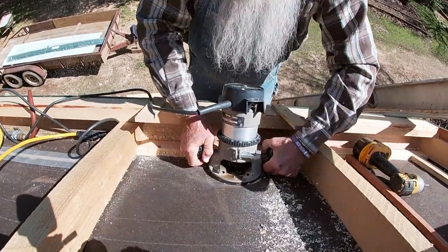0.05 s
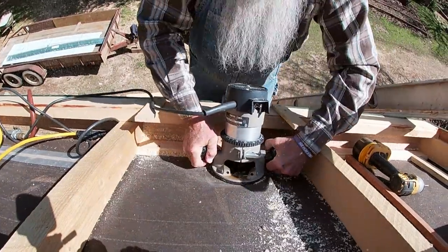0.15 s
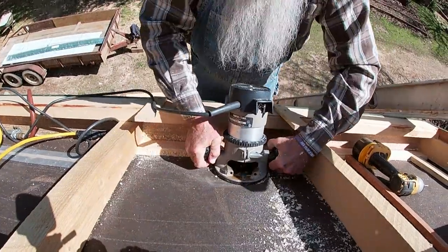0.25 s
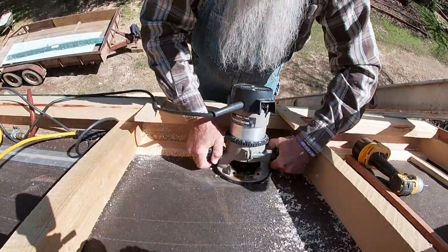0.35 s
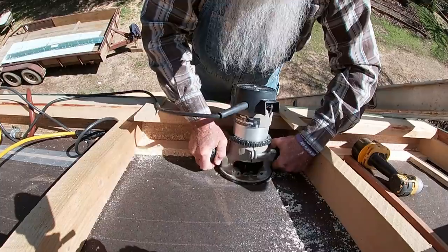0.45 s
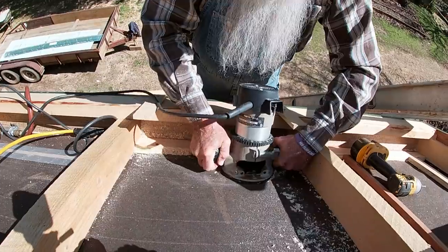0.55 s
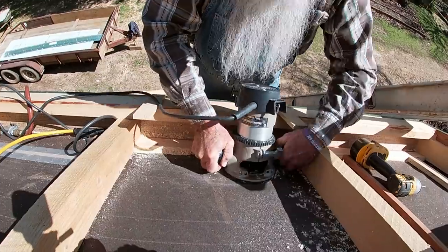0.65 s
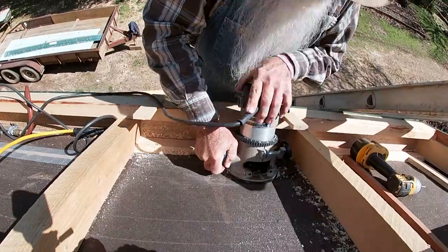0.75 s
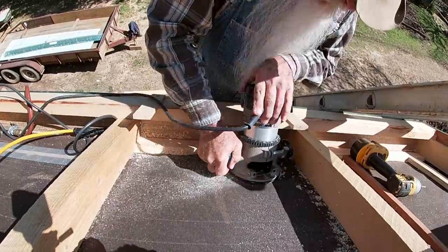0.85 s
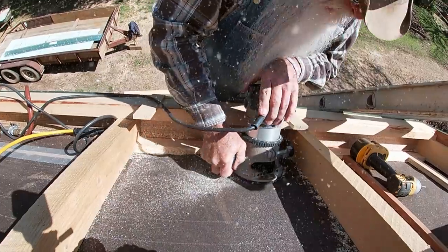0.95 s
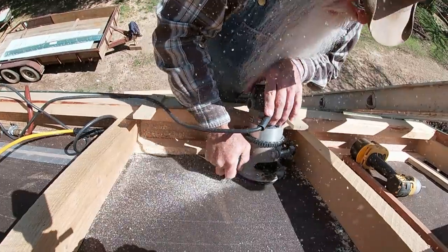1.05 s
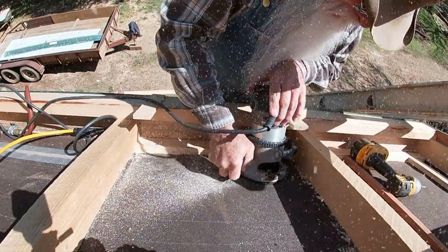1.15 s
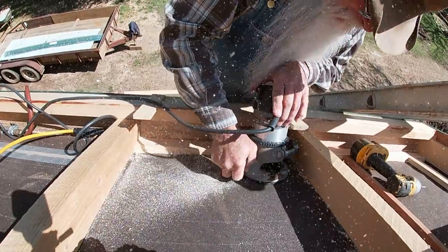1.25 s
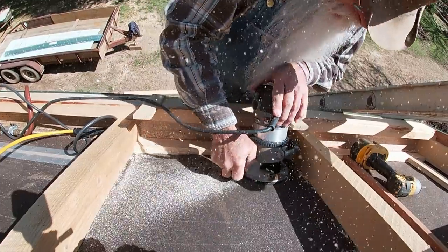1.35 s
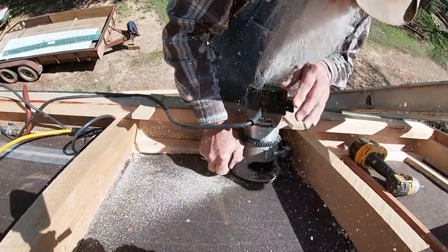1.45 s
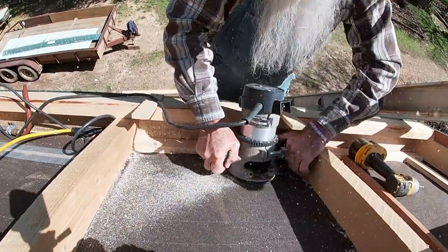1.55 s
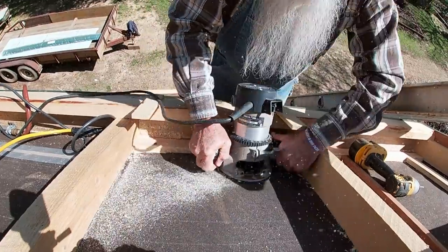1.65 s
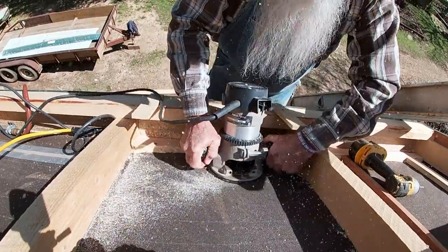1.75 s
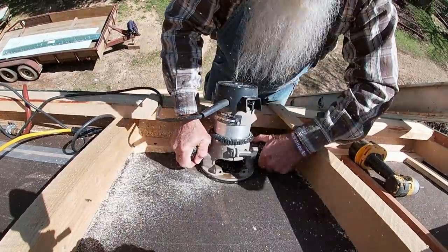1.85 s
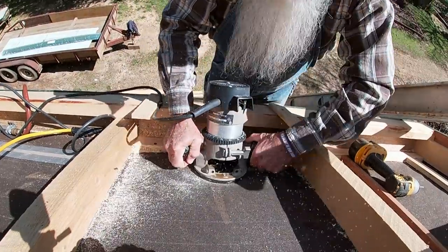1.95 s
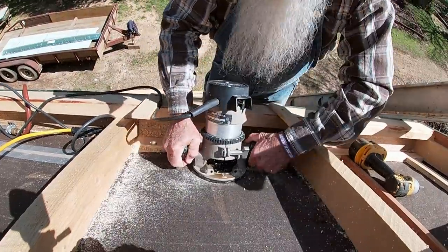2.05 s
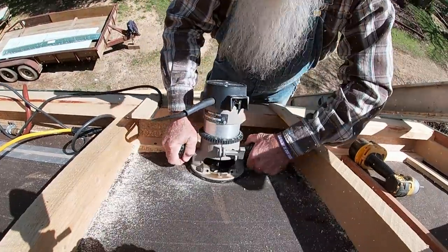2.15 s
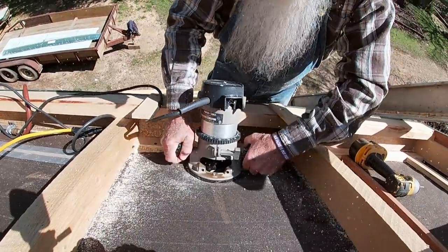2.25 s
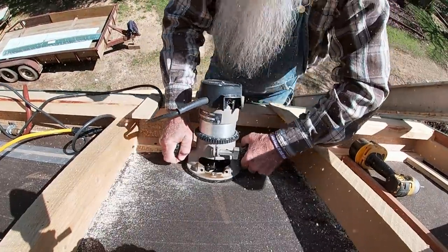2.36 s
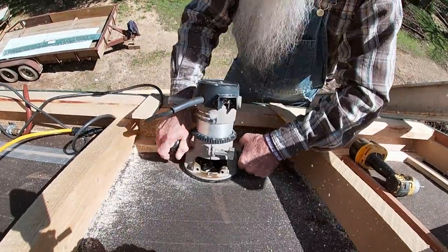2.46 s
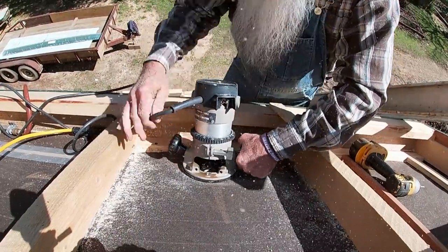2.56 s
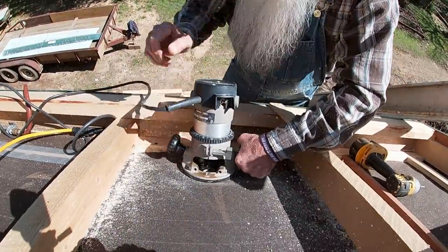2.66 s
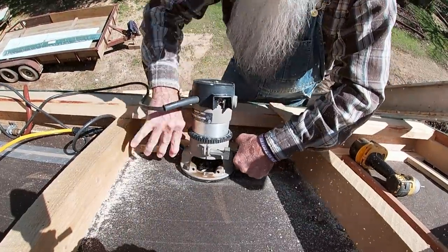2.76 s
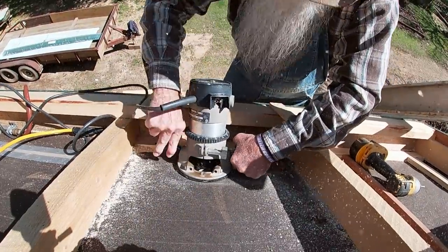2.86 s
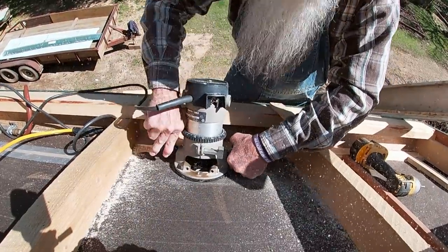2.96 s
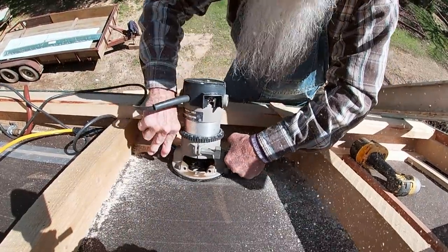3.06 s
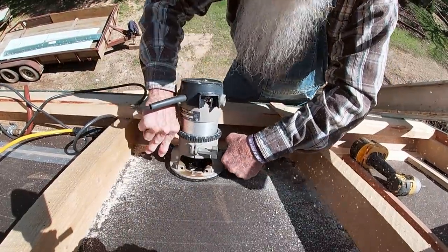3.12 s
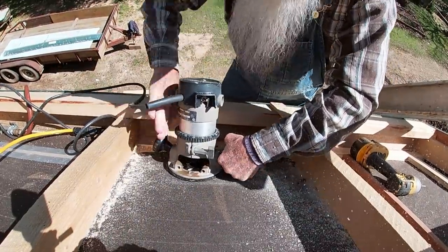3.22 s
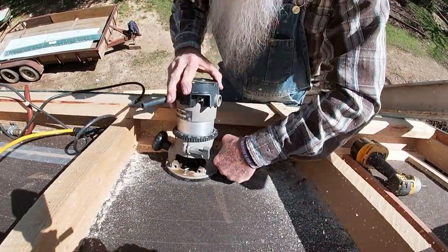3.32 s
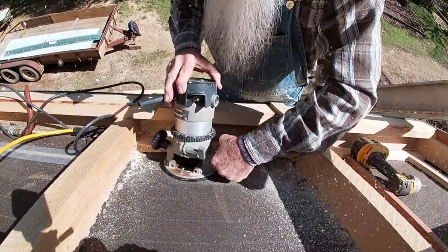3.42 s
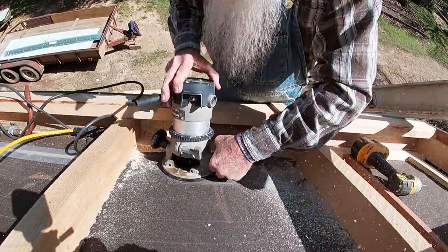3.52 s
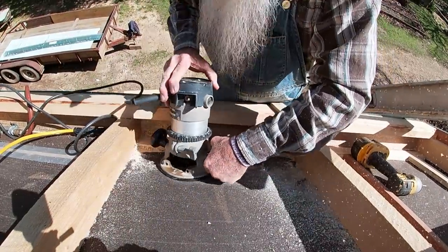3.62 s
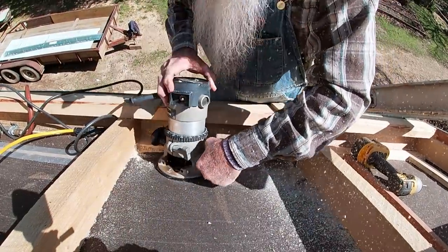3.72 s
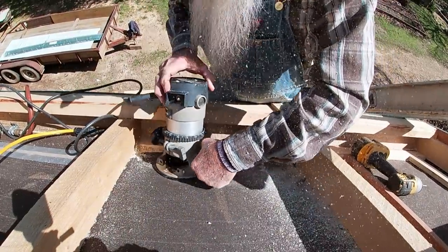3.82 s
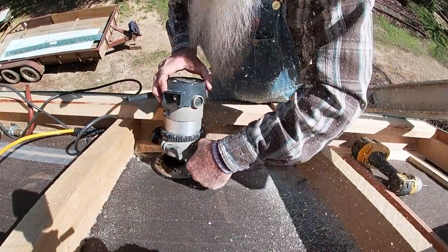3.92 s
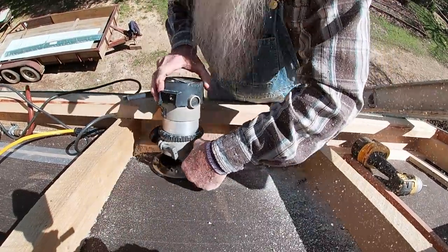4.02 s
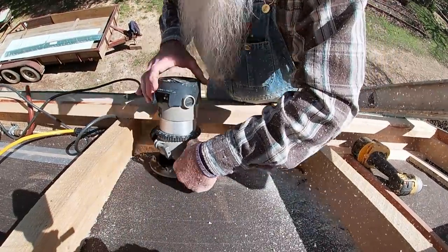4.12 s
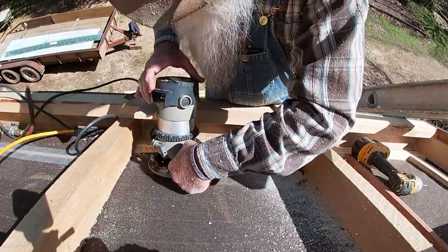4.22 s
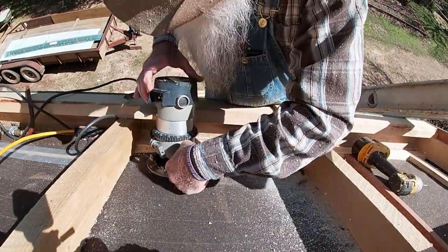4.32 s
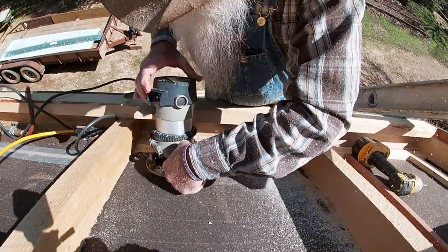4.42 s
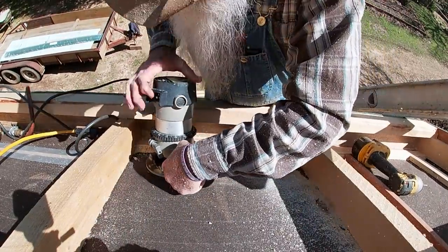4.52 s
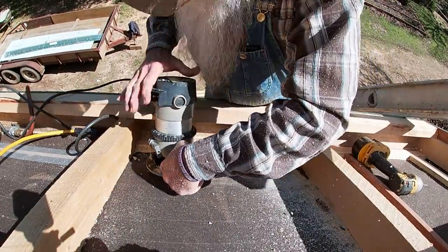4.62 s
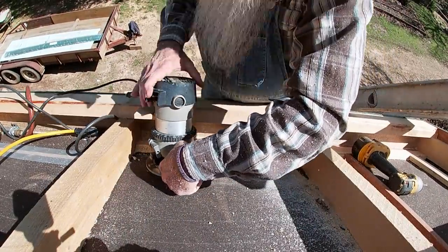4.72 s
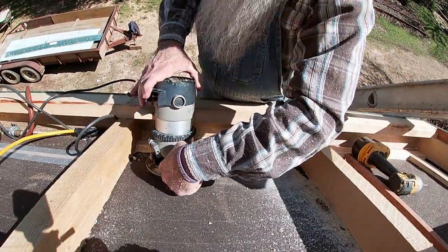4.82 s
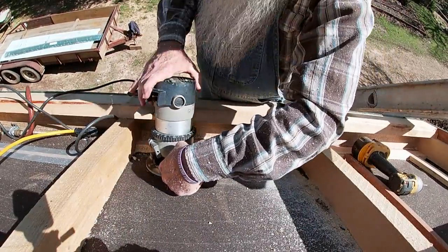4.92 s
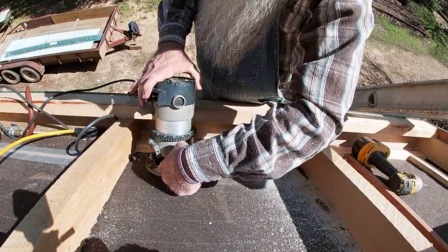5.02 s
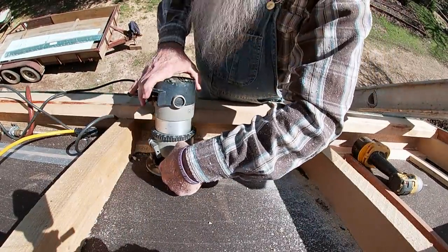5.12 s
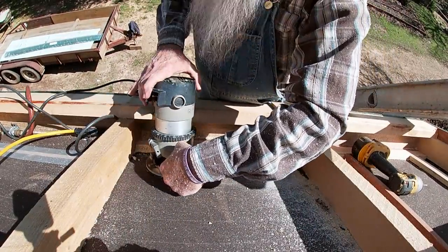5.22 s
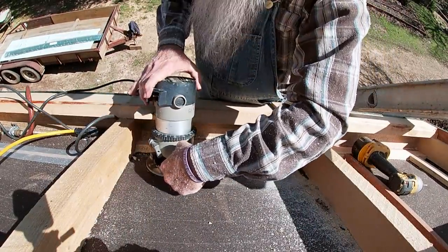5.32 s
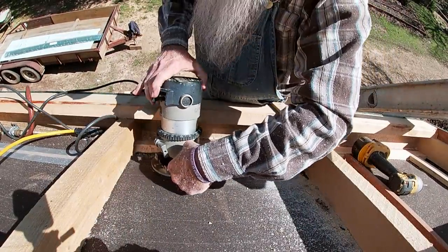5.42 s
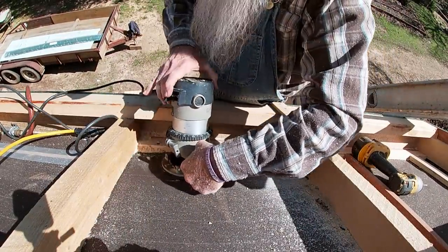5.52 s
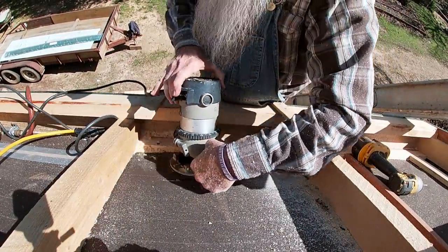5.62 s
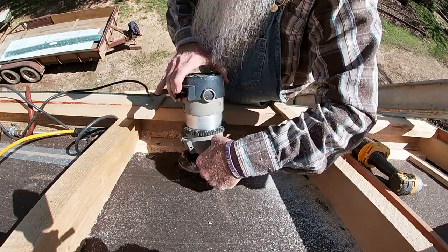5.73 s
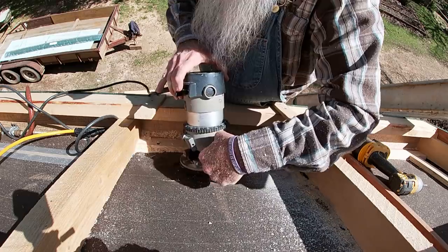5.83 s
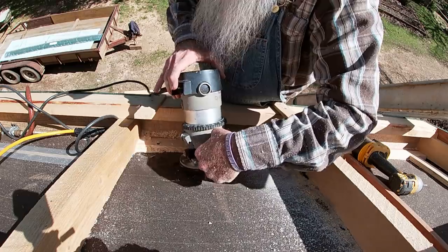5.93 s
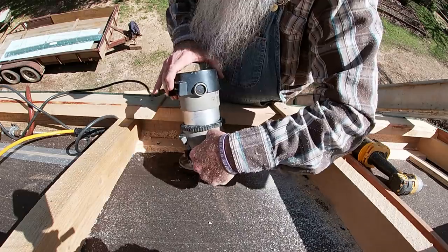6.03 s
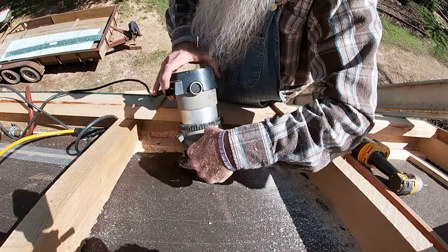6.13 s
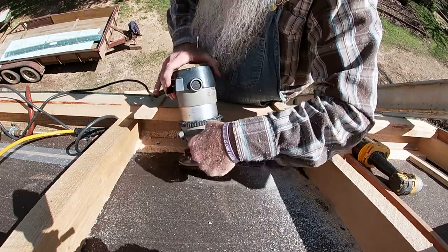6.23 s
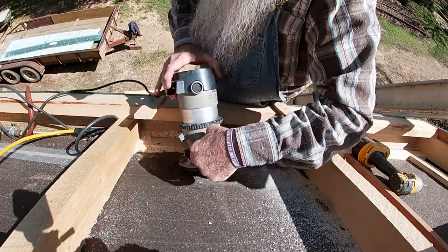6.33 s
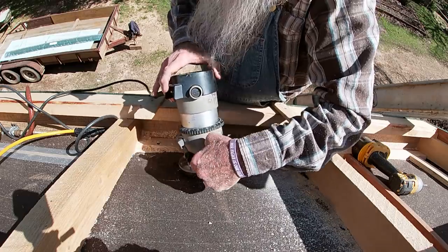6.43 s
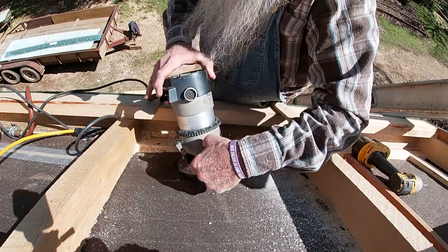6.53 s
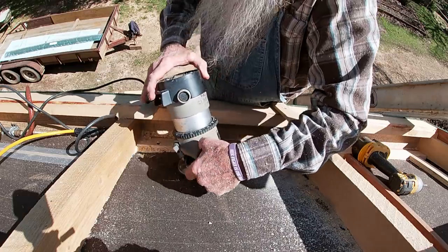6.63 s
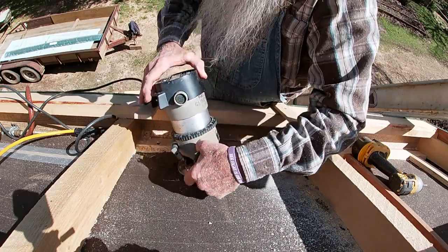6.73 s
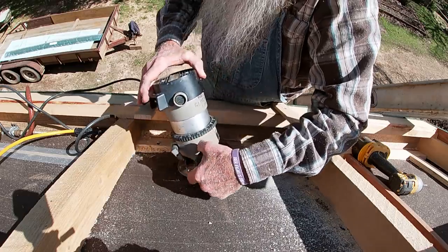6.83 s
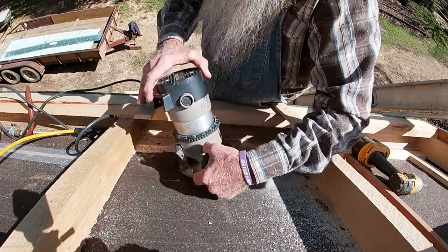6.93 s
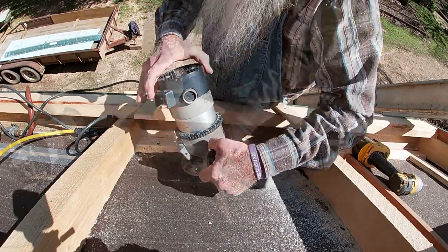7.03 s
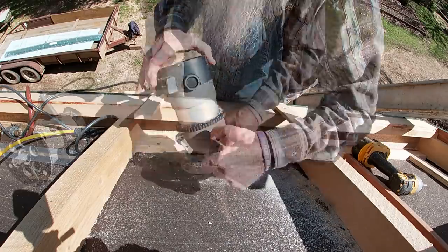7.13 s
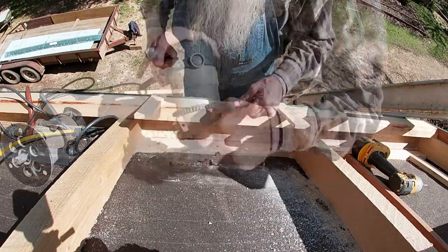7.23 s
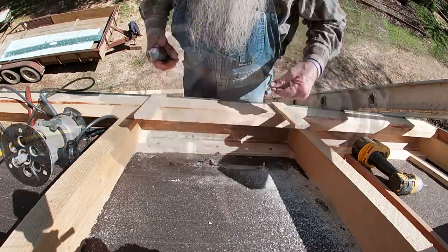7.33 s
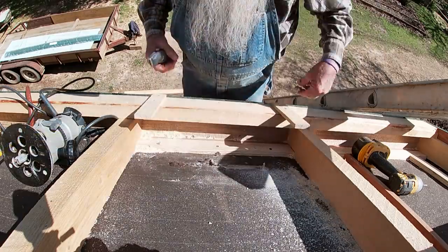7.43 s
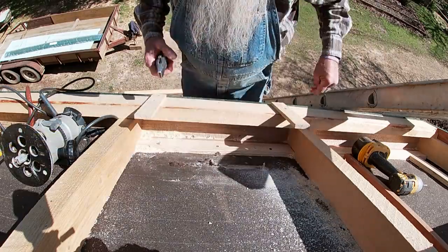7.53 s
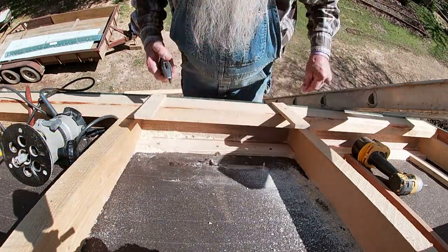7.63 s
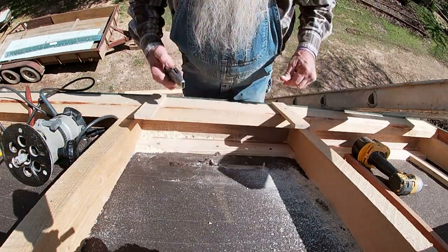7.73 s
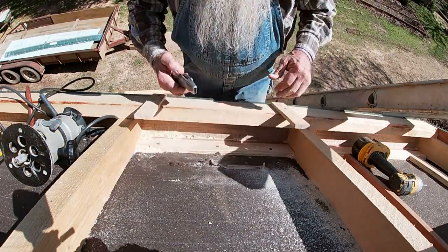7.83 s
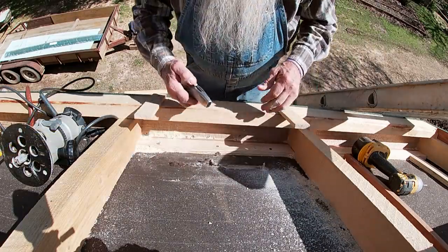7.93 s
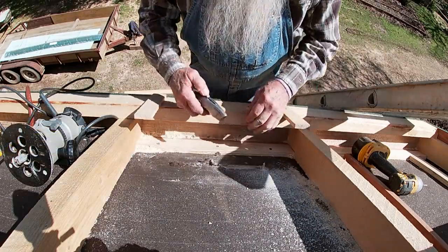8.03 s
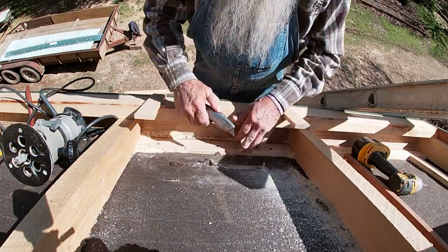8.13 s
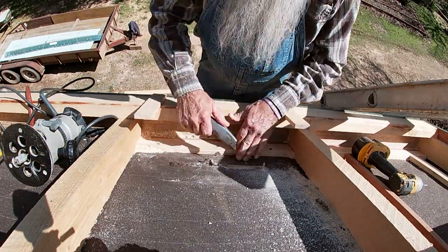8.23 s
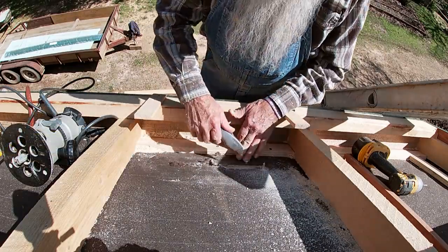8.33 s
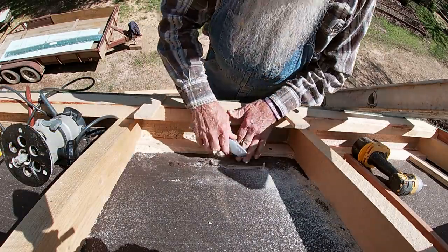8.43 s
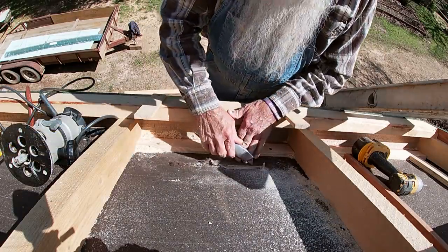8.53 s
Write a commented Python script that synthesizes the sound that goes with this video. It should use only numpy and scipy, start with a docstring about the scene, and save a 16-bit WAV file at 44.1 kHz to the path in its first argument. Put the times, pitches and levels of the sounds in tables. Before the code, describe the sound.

A close outdoor mono scene on hollow roof boards. From 0 s a router screams around 3 kHz with bright harmonics; at 0.2-0.7 s it sags and stutters in rough chatter with a thin squeal. It keeps cutting with raspy wood noise, then rises clear and freer near 4.2 kHz at 1.5-2 s, drops back into a laboured, wavering cut, chatters lightly around 3 s, and climbs again from 4.4 s. Switched off at 4.65 s, it falls rapidly into a ringing rattle of pulses, still by 5.2 s. Near-quiet follows: gritty base slides at 5.6-5.8 s, a strong hollow knock at 5.86 s, softer ones at 6.5-6.8 s. Wind swells briefly near 6.7 s, and from 7.4 s rumble and hiss rise. Metal clicks and a scrape come at 7.3 s, low handling bumps at 7.5-8.1 s, a loud sharp snap at 8.2 s, a soft knock at 8.3 s, and small clicks until the end around 8.5 s.

```python
"""A router cuts a slot in roof decking: its whine, a stack of harmonics, sags and chatters as the bit bites
and rises when it runs free, while torn wood adds shaped noise. Switched off, it runs down into a rattle of
single pulses that ring the housing. Then wind and hiss fade in, and the base slides (swelling noise) and
knocks on the hollow deck (decaying modes). Last, a metal hand tool clicks (damped modes and noise) and
scrapes, while handling bumps the single microphone (short low tones); one more soft knock falls among them."""
import sys
import numpy as np
from scipy import signal
from scipy.fft import rfft, irfft, next_fast_len
from scipy.io import wavfile
from scipy.ndimage import uniform_filter1d, map_coordinates

SR = 44100
rng = np.random.default_rng(int(sys.argv[2]) if len(sys.argv) > 2 else 0)


def file_out(sig):
    """Save sig as 16-bit WAV at sys.argv[1]."""
    # one column per channel
    cols = np.atleast_2d(sig).T
    # limit, then scale
    lim = np.clip(cols, -1, 1)
    pcm = np.round(lim * 32767).astype(np.int16)
    wavfile.write(sys.argv[1], SR, pcm)


N = 377937
TIME = np.arange(N) / SR  # seconds

# Wind and hiss outdoors: time_s, level_db
WIND_LEVEL = [(5.2, -55.5), (6.4, -50), (6.7, -33), (7.03, -47.5), (7.44, -46), (7.5, -30), (8.57, -32)]
HISS_LEVEL = [(5.9, -76), (7.05, -62), (7.4, -54.5), (8.57, -49.5)]
# Short low bumps from handling, over the wind rumble: peak_s, pitch_hz, level_db
HANDLING_BUMPS = [(7.498, 90, -24), (7.539, 137, -22.5), (7.706, 48.6, -18), (7.813, 25, -21.5),
                  (8.013, 86, -22.5), (8.075, 153, -22.5), (8.445, 48.4, -26)]
# Noise colours, as relative loudness: frequency_hz, level_db
GUST_COLOUR = [(22, 0.5), (60, -0.5), (95, -5.5), (150, -10), (350, -35), (900, -90)]  # wind rumble
HISS_COLOUR = [(250, 2.5), (800, 0), (1450, -2.5), (5500, -3.5), (9600, 1), (11000, -14.5), (15500, -22)]
FLOOR_COLOUR = [(200, 12.5), (1000, 1), (1600, -0.5), (4100, -7), (5500, 2.5), (6700, -3.5), (7500, -10),
                (15000, -28)]  # dark steady background
SLIDE_COLOUR = [(40, -1.5), (300, 10.5), (750, -3.5), (1100, -10.5), (1750, 0), (2800, -12.5), (6500, -23),
                (12000, -72)]  # base on sawdust
STEEL_COLOUR = [(300, -42), (1500, -17), (4200, 10), (7000, -3.5), (10000, -7), (15000, -32)]  # metal cracks and scrapes
CLACK_COLOUR = [(60, -31), (300, 7.0), (800, -7.5), (1800, -16.0), (14000, -50.0)]  # base hits deck
FAN_COLOUR = [(60, -21.5), (300, -12.5), (900, 0.5), (2100, 2), (3600, -1), (6800, -4.5), (9000, 7),
              (10900, 1), (15500, 2.5)]  # cooling air
HOUSING_COLOUR = [(100, -38.5), (720, -24.5), (980, -15), (1280, -15.5), (2550, 2.5), (3400, -10.5),
                  (4350, 0.5), (4950, -4.5), (5700, 1.5), (6300, 7.5), (7700, 4), (9000, -6), (10800, -24),
                  (13300, -6.5), (16000, -11)]  # router body
RASP_COLOUR = [(60, -49.5), (250, -29), (1250, -27.5), (2080, -5), (2450, -10), (3000, -11.5),
               (3950, -14.5), (4400, -1.5), (5300, -2), (5900, -8.5), (6500, -4.5), (7400, -15.5),
               (9500, -33), (13200, -16), (15200, -8)]  # tearing wood
SPRAY_COLOUR = [(150, -50.5), (3100, -17), (3750, 1), (4300, -19.5), (6900, -23), (7800, -5), (8700, -8),
                (9600, -0.5), (11000, 1), (12900, -8), (14400, -0.5), (16000, -8.5)]  # flying chips
# Base slides, then tool scrapes: peak_s, spread_s (from peak to 14 percent), level_db
BASE_SLIDES = [(5.6, 0.15, -37), (5.77, 0.077, -42.5), (6.85, 0.13, -47.5), (7.12, 0.031, -42)]
TOOL_SCRAPES = [(7.111, 0.029, -53.5), (7.247, 0.058, -48), (7.293, 0.027, -38.5), (8.244, 0.014, -38),
                (8.471, 0.019, -38)]
# Ringing modes of the metal tool and the roof deck: pitch_hz, level_db, fall_by_60_db_s
TOOL_MODES = [(3674, -5, 0.024), (4320, 11, 0.01), (6880, 8, 0.011), (9430, -6, 0.008)]
DECK_MODES = [(64.2, -4, 0.62), (101.8, 1, 0.62), (118.7, 1, 0.33), (162, 1, 0.3), (190, 6, 0.263),
              (279, -3, 0.26), (345, -11, 0.17), (448, -13.5, 0.11), (594, -13.5, 0.055), (830, -21, 0.06)]
# Clicks of the metal tool: start_s, level_db, tilt_db_per_octave, ring_length_factor
TOOL_CLICKS = [(7.2925, -19, 14, 1.3), (7.3063, -20, 22, 2), (7.311, -22, 18, 1.5), (8.009, -23.5, -2, 2.1),
               (8.182, -13.5, -5, .6), (8.202, -26, -4, 1.3), (8.2133, -1.5, -10, .6),
               (8.3596, -18, -7, 0.7), (8.464, -37, 0, 2.5), (8.4996, -25, 18, 1.7)]
# Knocks of the base on the deck: start_s, level_db, tilt_db_per_octave, clack_db
BASE_KNOCKS = [(5.411, -54.5, 2, 9.5), (5.702, -37, 6.5, 4), (5.836, -31.5, 4, -13),
               (5.864, -14.5, 1, -0.5), (5.873, -33, 18.5, 5), (5.885, -26, 9.5, -6), (6.105, -54, 1, 7.5),
               (6.533, -24.5, -5.5, 0), (6.557, -32.5, -11, -2), (6.746, -40.5, -9.5, -4.5),
               (6.812, -38.5, 3, 0), (8.31, -39.5, 2, 3)]
# Faint steady tones under the whine, strongest in the middle of the cut: pitch_hz, level_db (at most)
FAINT_TONES = [(470, -60), (945, -49.5), (2363, -53.5)]
# Treble of the cut, before the bite sets its strength: time_s, chip_spray_db, bit_ring_db, chopped_ring_db
TREBLE_LEVELS = [(0, -41, -26.5, -30), (.3, -31, -28, -31.5), (.62, -26.5, -33.5, -27),
                 (.8, -25.5, -28, -29.5), (1.25, -25, -34, -33), (1.65, -37.5, -45, -47),
                 (2.1, -32.5, -26.5, -32.5), (2.35, -53, -26, -28), (2.7, -40, -26.5, -35),
                 (2.85, -49, -24.5, -29), (3.25, -63, -26, -29.5), (3.65, -57, -25.5, -49),
                 (4.3, -51, -27.5, -28.5), (4.6, -21, -30.5, -19)]
# The bit chatters in the cut: start_s, end_s, depth_0_to_1
CHATTER_SPANS = [(.18, .685, .85), (2.88, 3.25, 0.4)]
# The bit skids and its squeal takes over: start_s, end_s, share_0_to_1
SKID_SPANS = [(.18, .275, 0.65), (.402, .422, 0.77), (.466, .486, 0.77)]
# Driven pitch of the whine, which sags under load: time_s, pitch_hz
WHINE_PITCH = [(0.0, 3350), (0.045, 3420), (0.12, 2846), (0.17, 2883), (0.19, 2550), (0.265, 2606),
               (0.3, 2910), (0.4, 2605), (0.45, 2736), (0.49, 2570), (0.675, 2643), (0.71, 3280),
               (0.79, 3024), (1.15, 3075), (1.35, 3320), (1.4, 3540), (1.46, 4114), (1.52, 4235),
               (1.64, 4289), (1.99, 4221), (2.04, 3960), (2.09, 3314), (2.18, 3190), (2.375, 3034),
               (2.42, 3475), (2.445, 2960), (2.5, 3050), (2.54, 3260), (2.59, 3176), (2.65, 3297),
               (2.775, 3418), (2.8, 2940), (2.87, 2886), (2.98, 2646), (3.03, 2710), (3.12, 2580),
               (3.22, 2700), (3.27, 2780), (3.295, 3140), (3.34, 3110), (3.365, 2890), (3.39, 3015),
               (3.54, 3183), (3.6, 2996), (3.66, 3103), (3.77, 2980), (3.86, 3176), (3.92, 3077),
               (4.0, 3265), (4.13, 3090), (4.36, 3370), (4.41, 3558), (4.5, 3560), (4.56, 3883),
               (4.65, 4046)]
# Usual strength of the whine as harmonics cross tool resonances: pitch_hz, fundamental_db, octave_db
WHINE_STRENGTH = [(2580, -31.5, -20.5), (3154, -28.5, -21), (3460, -18, -19), (3520, -28.5, -20.5),
                  (4060, -16, -27), (4250, -13.5, -37)]
# Upper partials: time_s, octave_change_db (against its usual strength), twelfth_db
PARTIAL_LEVELS = [(.04, -11, -38), (.27, 4, -51), (.35, 5, -44), (.65, 1.5, -39), (.85, -7, -35),
                  (1.3, -4.5, -31.5), (2.0, -2, -33), (2.15, -5, -41.5), (2.75, -2, -39.5),
                  (2.83, -7.5, -30.5), (3.02, 0, -38.5), (3.06, 8.5, -45.5), (3.1, -5.5, -35.5),
                  (3.5, 0, -33), (3.9, 0, -32), (4.55, 1, -59)]
# The fundamental weakens for a while: start_s, end_s, change_db
FUNDAMENTAL_DIPS = [(.09, .68, -13.5), (.77, .92, -11), (2.165, 2.385, -18), (2.45, 2.53, -10),
                    (3.06, 3.17, -9.5), (3.295, 3.36, -22), (3.43, 3.6, -12.5), (3.96, 4.355, -18.5)]

BUMP_CYCLES = 1.25  # spread of a bump from its peak to 14 percent, in its own cycles
OFF_S, STOP_S = 4.654, 5.17  # switch thrown; rotor still
DRAG_HZ = 3190  # above this pitch air drag brakes the rotor more than friction does
COAST_DB, COAST_DB_PER_S = -17, 24.5  # run-down level at switch-off, and its fall
FREE_HZ, LADEN_HZ = 4220, 2647  # whine pitch with the bit free, and under full load
RASP_DB = -26.5  # middle level of the rasp, before the bite sets its strength
STALL_DB = 7.5  # cut in level at full chatter: the bit rubs more and tears less
EASE_DB = 16  # fall of the cutting noise from full load to running free
SQUEAL_HZ, SQUEAL_DB, SKID_DB = 8870, -33.5, 10.5  # chatter squeal; SKID_DB is added in a full skid
STUTTER_HZ = 76.4  # middle rate of the catches, which come unevenly
SLIP_SAG, SLIP_DB = .075, 6  # a full catch drags the pitch down by this share and tears this much louder
TOP_HZ = 15850  # upper band limit


def amp(db):
    """Turns decibels into an amplitude factor."""
    return 10 ** (np.asarray(db) / 20)


def unit(x):
    """Scales a signal to an average power of 1."""
    return x / np.sqrt(np.mean(np.abs(x) ** 2) + 1e-20)


def curves(rows):
    """Draws one line through time for each column after the first."""
    s, *cols = np.transpose(rows)
    return [np.interp(TIME, s, c) for c in cols]


def at_speed(rows, hz):
    """Reads each column after the first at the pitch of the moment."""
    f, *cols = np.transpose(rows)
    return [np.interp(hz, f, c) for c in cols]


def colour(points, hz):
    """Reads the gain of a noise colour or body on a logarithmic pitch scale."""
    f, db = np.transpose(points)
    return amp(np.interp(np.log(hz + 1), np.log(f), db))


def filtered(x, response):
    """Makes each frequency stronger or weaker by the given response."""
    size = next_fast_len(N + 8192)  # spare room at the end, so the tail does not land on the start
    spectrum = rfft(x, size) * response(np.fft.rfftfreq(size, 1 / SR))
    return irfft(spectrum, size)[:N]


def noise(points):
    """Makes noise of the given colour, with an average power of 1."""
    return unit(filtered(rng.standard_normal(N), lambda hz: colour(points, hz)))


def wobble(rate):
    """Makes a smooth random curve through rate new points a second."""
    return unit(map_coordinates(rng.standard_normal(N // 4), [TIME * rate], mode="wrap"))


def fade(s, width):
    """Rises smoothly from 0 to 1 around time s."""
    return .5 + .5 * np.tanh((TIME - s) / width)


def spans(rows, edge_s=0.0035):
    """Holds each row's value from its start to its end, with soft edges."""
    return sum(value * (fade(start, edge_s) - fade(end, edge_s)) for start, end, value in rows)


def strokes(rows):
    """Shapes strokes that each swell and fade around their peak."""
    return sum(amp(db) * np.exp(-2 * ((TIME - s) / spread) ** 2) for s, spread, db in rows)


def add(track, s, sound):
    """Mixes a sound into the track at time s."""
    part = track[round(s * SR):][:len(sound)]
    part += sound[:len(part)]


def impulse(points, size=2048):
    """Makes the ring of a tapped body: all its energy comes as early as its spectrum allows."""
    cepstrum = irfft(np.log(colour(points, np.fft.rfftfreq(size, 1 / SR))))
    # folding the second half onto the first leaves no sound before the tap
    cepstrum[1:size // 2] *= 2
    cepstrum[size // 2 + 1:] = 0
    return irfft(np.exp(rfft(cepstrum)))


def ring(modes, t, tilt_db, scatter_db):
    """Rings struck modes as dying sines; a higher tilt favours the treble, as a harder blow does."""
    hz, db, t60 = np.transpose(modes)[:, :, None]
    tilt = tilt_db * np.log2(hz / np.median(hz))
    level = db + tilt + scatter_db * rng.standard_normal(hz.shape)
    sign = (-1) ** np.arange(len(hz))[:, None]
    return np.sum(sign * amp(level - 60 * t / t60) * np.sin(2 * np.pi * hz * t), axis=0)


def outdoors():
    """Wind rumbles on the microphone over a dark floor and a soft hiss that slowly comes up."""
    wind_db, = curves(WIND_LEVEL)
    hiss_db, = curves(HISS_LEVEL)
    buffet = amp(wind_db) * unit(amp(4.2 * wobble(22)) * noise(GUST_COLOUR))
    floor = amp(-63) * noise(FLOOR_COLOUR)
    hiss = amp(hiss_db) * noise(HISS_COLOUR)
    return (buffet + floor + hiss) * fade(5.17, 0.013)


def handling():
    """Handling bumps the microphone: each bump is a low tone that swells and fades within a few cycles."""
    out = np.zeros(N)
    for s, hz, db in HANDLING_BUMPS:
        swell = strokes([(s, BUMP_CYCLES / hz, db)])
        out += swell * np.cos(2 * np.pi * hz * (TIME - s))
    return out * fade(5.17, 0.013)


def grit(rate, depth_db):
    """Makes the strength of rubbing jump about, as rough grains do."""
    return unit(amp(depth_db * wobble(rate)))


def friction():
    """The base grinds over sawdust; the hand tool scrapes in short gritty strokes."""
    slides = strokes(BASE_SLIDES) * grit(90, depth_db=1.5) * noise(SLIDE_COLOUR)
    scrapes = strokes(TOOL_SCRAPES) * grit(400, depth_db=1.5) * noise(STEEL_COLOUR)
    return slides + scrapes


def clicks():
    """Metal snaps on metal: a short crack of noise and a quickly damped ring."""
    out, t = np.zeros(N), np.arange(SR // 5) / SR
    for s, db, tilt_db, length in TOOL_CLICKS:
        crack = noise(STEEL_COLOUR)[:len(t)]
        dying = amp(-60 * t / (0.023 * length)) + amp(-32.0 - 60 * t / 0.18)  # fast, then a faint tail
        steel = ring(np.array(TOOL_MODES) * [1, 1, length], t, tilt_db, scatter_db=2)
        onset = 1 - np.exp(-t / 0.0011)
        add(out, s, amp(db) * (.5 * steel + crack * dying) * onset)
    return out


def knocks():
    """The base clacks on the deck, which booms like a drum."""
    out, t = np.zeros(N), np.arange(SR) / SR
    for s, db, tilt_db, clack_db in BASE_KNOCKS:
        contact = noise(CLACK_COLOUR)[:SR]
        dying = amp(clack_db - 60 * t / 0.081) + amp(clack_db - 23.0 - 60 * t / 0.48)
        loose = .0005 * wobble(30)[:SR] * (1 - np.exp(-t / .03))  # loose boards make the modes waver
        boom = ring(DECK_MODES, t + loose, tilt_db, scatter_db=1.5)
        onset = 1 - np.exp(-t / 0.00032)
        add(out, s, amp(db) * (boom + contact * dying) * onset)
    return out


def pitch():
    """Inertia rounds every speed change; once off, air drag and steady friction brake the rotor."""
    driven, = curves(WHINE_PITCH)
    left = np.clip((STOP_S - TIME) / (STOP_S - OFF_S), .005, 1)  # share of the run-down still to come
    braked = DRAG_HZ * np.tan(left * np.arctan(driven / DRAG_HZ))
    return uniform_filter1d(braked, size=SR // 70)


def scattered(x):
    """The rafters answer by paths that shift as the tool shakes, so each harmonic flutters on its own."""
    t = np.arange(SR // 30) / SR
    echoes = np.zeros(N)
    for _ in range(2):
        wall = rng.standard_normal(len(t)) * amp(-60 * t / .025)
        echoes += wobble(45) * signal.fftconvolve(x, wall / np.linalg.norm(wall))[:N]
    return amp(-2) * (x + amp(-6) * echoes)


def run_down(phase):
    """One pulse a cycle rings the housing until the whine breaks into ticks; the air rush dies with speed."""
    hz = pitch()
    level_db = COAST_DB - COAST_DB_PER_S * np.clip(TIME - OFF_S, 0, None)
    # sample position at which each whole turn of the whine is reached
    turns = phase / (2 * np.pi)
    at = np.interp(np.arange(1, int(turns[-1])), turns, np.arange(N))
    at = at[(at > (OFF_S - .05) * SR) & (at < (STOP_S - .012) * SR)]
    at = at + 0.031 * rng.standard_normal(len(at))  # uneven timing blurs the upper harmonics
    # each pulse is a narrow rounded spike, so that it can fall between two samples
    taps = at.astype(int)[:, None] + np.arange(-8, 9)
    offset = taps - at[:, None]
    shape = np.sinc(offset) * np.cos(np.pi * offset / 18) ** 2
    pulses = np.bincount(taps.ravel(), (shape / np.sqrt(hz[taps])).ravel(), N)
    body = impulse(HOUSING_COLOUR)
    rung = signal.fftconvolve(pulses, body / np.linalg.norm(body))[:N]
    rattle = np.sqrt(SR) * scattered(rung) * fade(4.706, 0.075)
    rubbing = amp(-8 - 20 * hz / FREE_HZ) * noise(HOUSING_COLOUR)
    air = amp(-14) * hz / FREE_HZ * noise(FAN_COLOUR)
    # the fundamental lingers while the rotor is fast
    hum_level = amp(-1.5 + 2.3 * wobble(40)) * np.sqrt(colour(HOUSING_COLOUR, hz))
    hum = hum_level * (1 - fade(5.01, 0.005)) * np.sin(phase)
    return amp(level_db) * (rattle + rubbing + air + hum) * (1 - fade(5.16, 0.01))


def mid_cut():
    """Rises to nearly 1 for the middle of the cut and stays near a quarter elsewhere."""
    return 0.26 + 0.69 * (fade(1.33, 0.031) - fade(3.85, 0.28))


def faint_tones(load):
    """Faint wavering sines lie under the whine, strongest in the middle of the cut and weaker under load."""
    tones = np.zeros(N)
    for hz, db in FAINT_TONES:
        tones += amp(db + 1.5 * wobble(25)) * np.sin(2 * np.pi * hz * TIME + .5 * wobble(22))
    return amp(-8 * load) * mid_cut() ** 2 * tones


def cooling_air():
    """Cooling air rushes as shaped noise, clearest while the hand is off the vents."""
    return amp(-36.0) * np.sqrt(mid_cut()) * noise(FAN_COLOUR)


def whirl(phase):
    """The shaft rings in regular fits when half the pitch nears its bending mode, most as the motor lets go."""
    nearness = 1 / (1 + ((pitch() / 2 - 2010) / 110) ** 2)  # bending mode at 2010 Hz
    fits = amp(-32.5 + 3.4 * wobble(12)) * np.cos(np.pi * 13.6 * TIME) ** 20  # 13.6 a second
    release = amp(-23.5) * np.exp(-((TIME - 4.645) / 0.044) ** 2)
    return (fits + release) * nearness * np.sin(phase / 2)


def catches():
    """Gives chatter depth and its brief uneven catches of the bit; a skidding bit hardly catches."""
    depth = np.clip(spans(CHATTER_SPANS), 0, 1)
    turns = np.cumsum(STUTTER_HZ * amp(3 * wobble(60))) / SR
    hold = 1 - np.clip(spans(SKID_SPANS), 0, 1)
    return depth, depth * np.cos(np.pi * turns) ** 8 * hold


def chatter(phase, depth, catch):
    """The chattering bit squeals, most when it skids; passing edges add a sideband below and above."""
    bursts = depth * amp(SQUEAL_DB + SKID_DB * spans(SKID_SPANS) + 3 * wobble(90))
    squeal_hz = SQUEAL_HZ * (1 - SLIP_SAG * catch + .004 * wobble(60) + .006 * wobble(900))
    squeal = 2 * np.pi * np.cumsum(squeal_hz) / SR
    sidebands = amp(-8.5) * np.sin(squeal - 2 * phase) + amp(2.5) * np.sin(squeal + 2 * phase)
    return bursts * (np.sin(squeal) + sidebands)


def bit_ring(width_hz):
    """The bit rings as noise in a narrow band around its resonance, kept complex so it can be shifted."""
    resonance = lambda hz: 1 / (1 + ((hz - 8570) / width_hz) ** 2)
    return unit(signal.hilbert(filtered(rng.standard_normal(N), resonance))) * np.sqrt(2)


def cutting(load, phase, depth, catch):
    """Torn fibres rasp, spray and ring the bit; passing edges chop that ring into two sidebands."""
    spray_db, ring_db, chop_db = curves(TREBLE_LEVELS)
    bite_db = -EASE_DB * (1 - load) ** 1.92 - STALL_DB * depth + SLIP_DB * catch
    bite = amp(bite_db) * (1 - fade(4.77, .03))
    tearing = unit(amp(load * (1.1 * wobble(15) + .9 * wobble(700))))
    ringing = amp(ring_db) * bit_ring(width_hz=337).real
    edges = np.exp(2j * phase) + amp(-3.0) * (1 - load) * np.exp(1j * phase)
    chopped = amp(chop_db) * (bit_ring(width_hz=390) * edges).real
    rasp = amp(RASP_DB + wobble(30)) * noise(RASP_COLOUR)
    spray = amp(spray_db) * noise(SPRAY_COLOUR)
    return bite * tearing * (rasp + spray + ringing + chopped)


def rotation(catch):
    """Gives load 0-1 and whine phase: deeper bites make speed wander with the grain; catches jerk it down."""
    load = np.clip((FREE_HZ - curves(WHINE_PITCH)[0]) / (FREE_HZ - LADEN_HZ), 0, 1)
    grain = .007 * load * wobble(32)
    shudder = (.0003 + .009 * load ** 6) * wobble(80) + (.001 + .011 * load ** 5) * wobble(900)
    jerk = SLIP_SAG * (catch - uniform_filter1d(catch, size=SR // 20))
    whine_hz = pitch() * (1 + grain + shudder - jerk)
    return load, 2 * np.pi * np.cumsum(whine_hz) / SR


def whine(load, phase, catch):
    """Sounds four cutter harmonics; catches and skids break the even ones, and the fourth is breathy."""
    first_db, second_db = at_speed(WHINE_STRENGTH, pitch())
    shift_db, third_db = curves(PARTIAL_LEVELS)
    grip = (1 - .88 * catch) * (1 - np.clip(spans(SKID_SPANS), 0, 1))
    fundamental = amp(first_db + spans(FUNDAMENTAL_DIPS, edge_s=0.011))
    octave = grip * amp(second_db + shift_db)
    twelfth = amp(third_db + 2.4 * wobble(11))
    swell = 1 / (1 + ((4 * pitch() - 13750) / 750) ** 2)  # resonance at 13750 Hz
    fourth = amp(-12.5) * octave * (1 + wobble(900)) * swell
    out = np.zeros(N)
    for order, gain in enumerate([fundamental, octave, twelfth, fourth], start=1):
        flutter = amp((.4 + 1.6 * load ** 2) * wobble(36))
        out += gain * flutter * np.sin(order * phase)
    return out


def scene():
    """Mixes all sources, switches the router from powered to run-down, and feeds both channels alike."""
    depth, catch = catches()
    load, phase = rotation(catch)
    powered = 1 - fade(OFF_S, 0.0015)
    background = outdoors() + handling() + friction() + clicks() + knocks()
    running = whine(load, phase, catch) + cooling_air() + faint_tones(load)
    router = powered * running + (1 - powered) * run_down(phase)
    cut = cutting(load, phase, depth, catch) + chatter(phase, depth, catch)
    mono = background + router + cut + whirl(phase)
    return np.array([mono, mono])


def record(dry):
    """Rounds off the highest peaks and cuts steeply above the band limit."""
    rounded = dry / (1 + np.abs(dry / .9) ** 6) ** (1 / 6)
    band = lambda hz: 1 / (1 + (hz / TOP_HZ) ** 300)
    return np.array([filtered(channel, band) for channel in rounded])


dry = scene()
out = record(dry)
file_out(out)
```